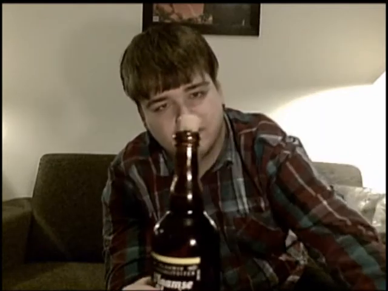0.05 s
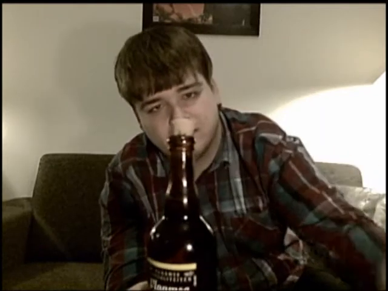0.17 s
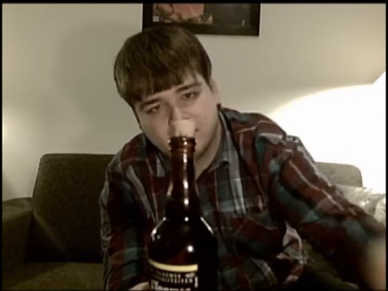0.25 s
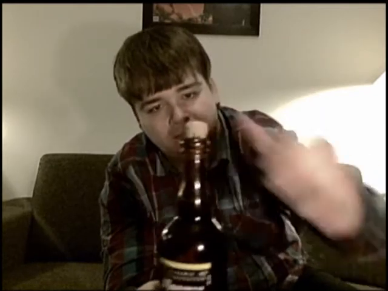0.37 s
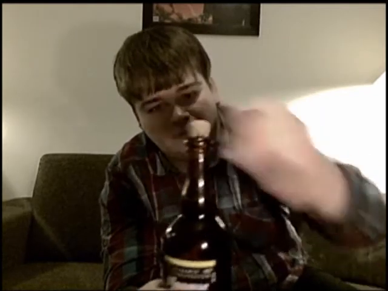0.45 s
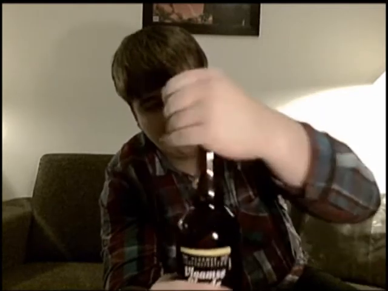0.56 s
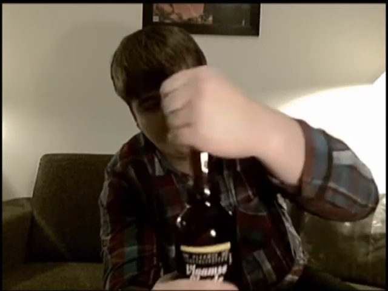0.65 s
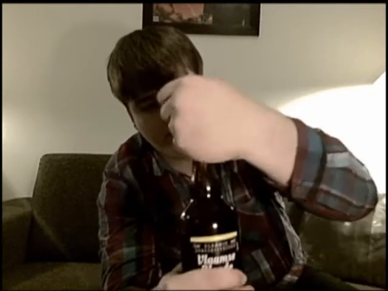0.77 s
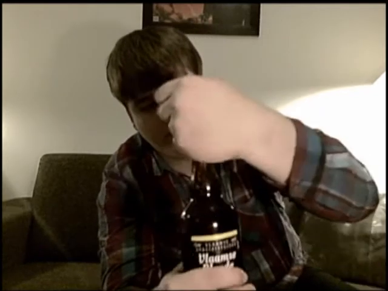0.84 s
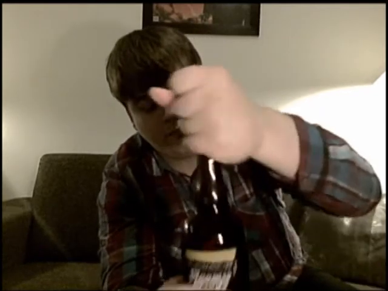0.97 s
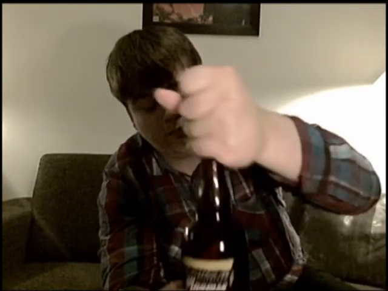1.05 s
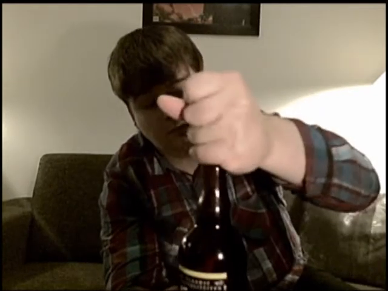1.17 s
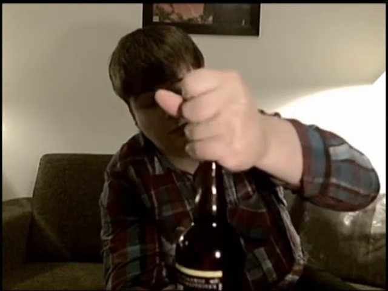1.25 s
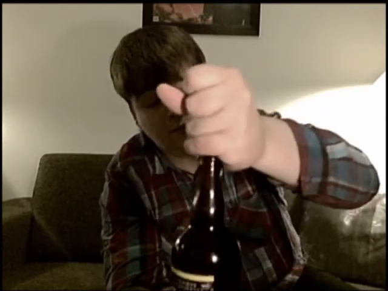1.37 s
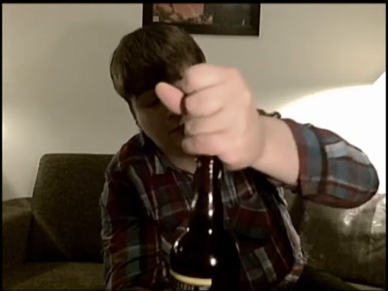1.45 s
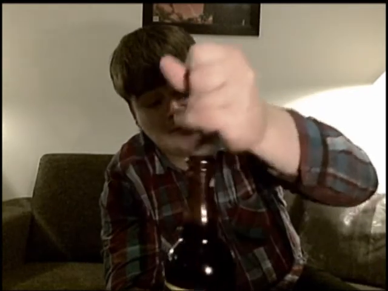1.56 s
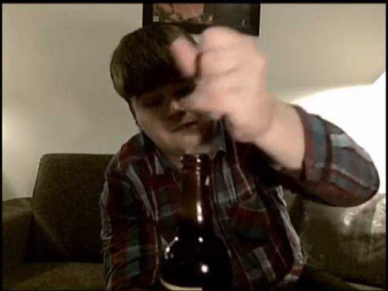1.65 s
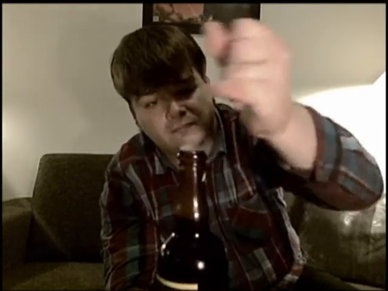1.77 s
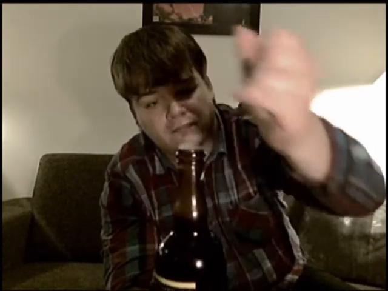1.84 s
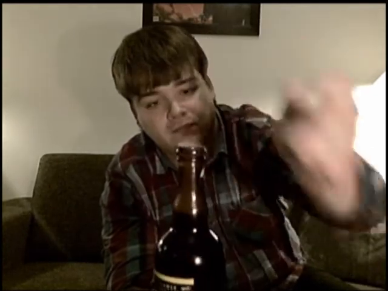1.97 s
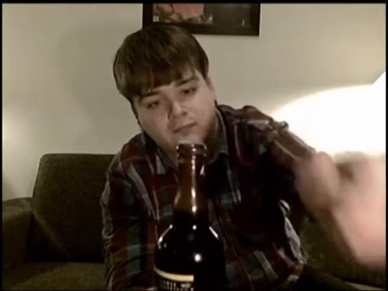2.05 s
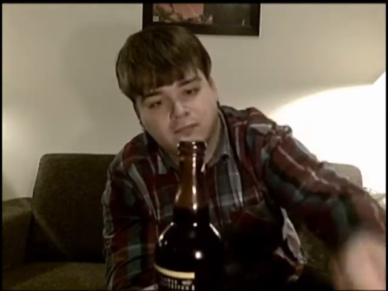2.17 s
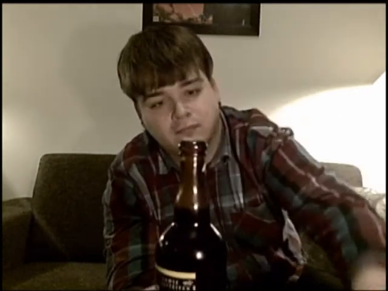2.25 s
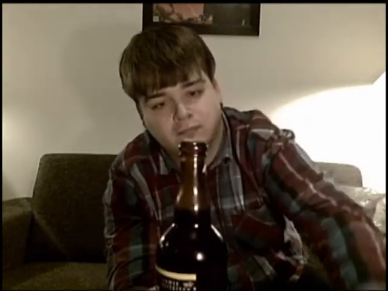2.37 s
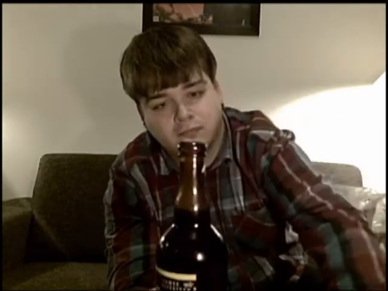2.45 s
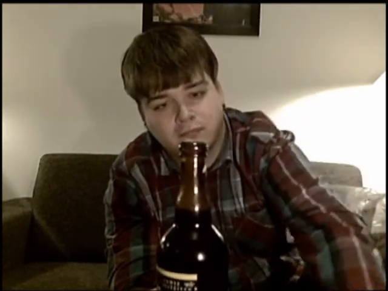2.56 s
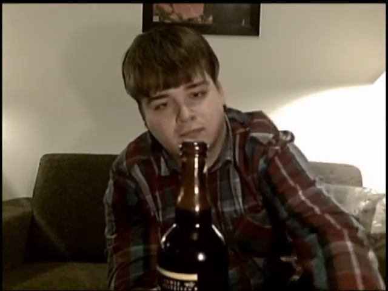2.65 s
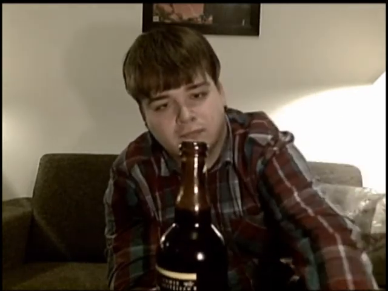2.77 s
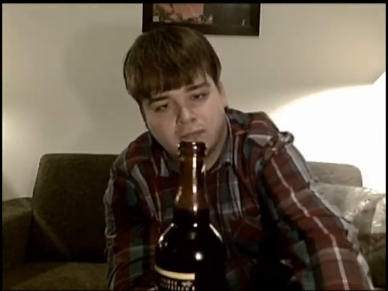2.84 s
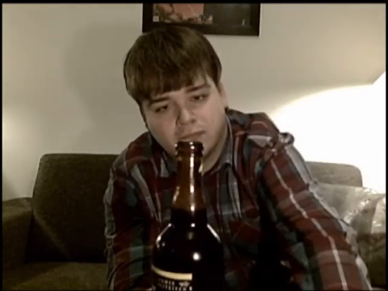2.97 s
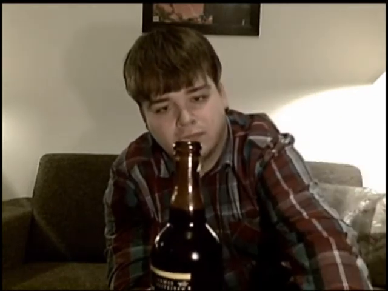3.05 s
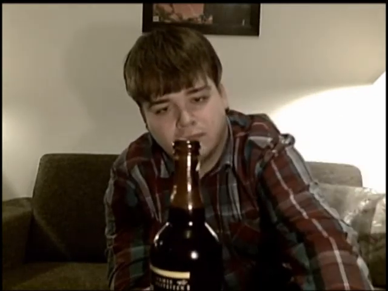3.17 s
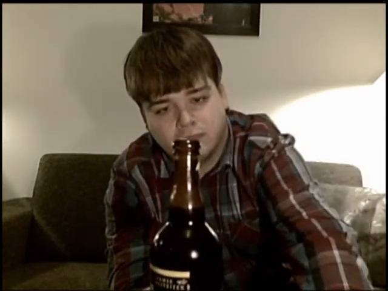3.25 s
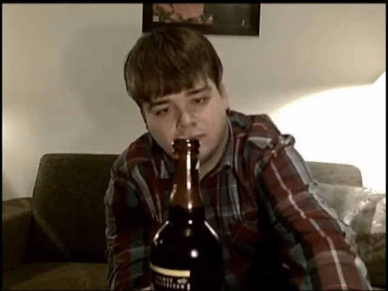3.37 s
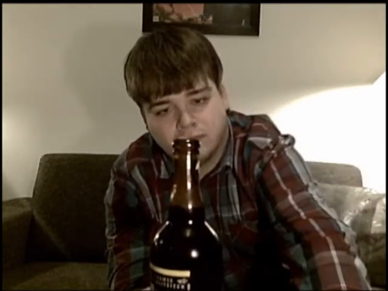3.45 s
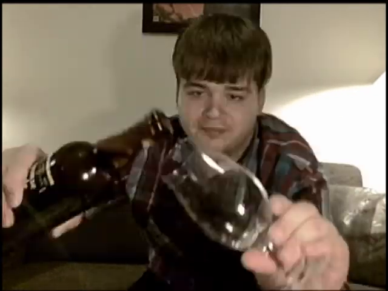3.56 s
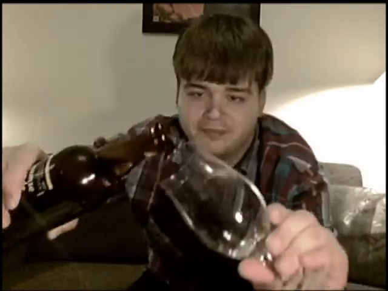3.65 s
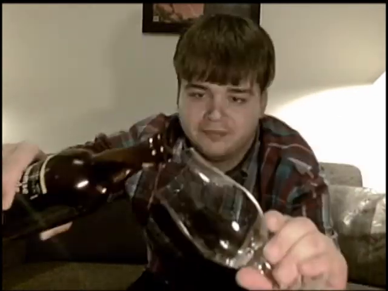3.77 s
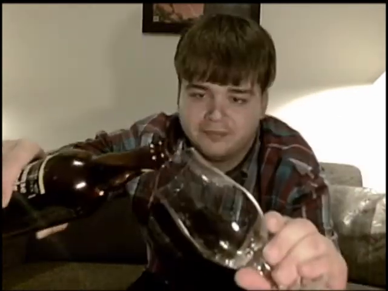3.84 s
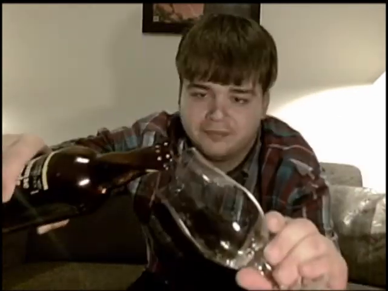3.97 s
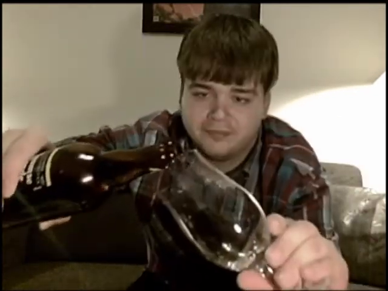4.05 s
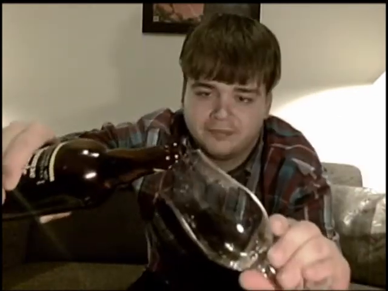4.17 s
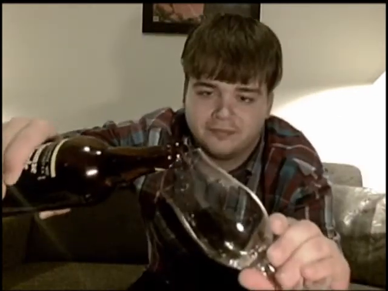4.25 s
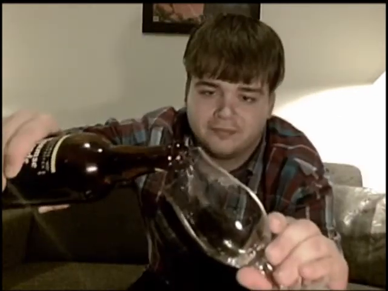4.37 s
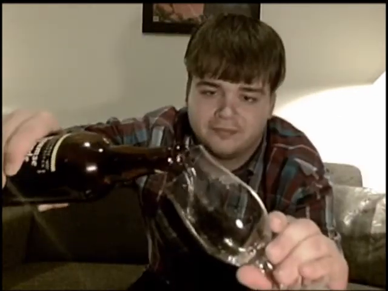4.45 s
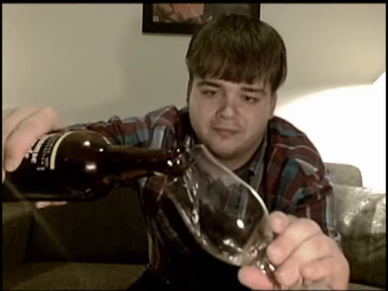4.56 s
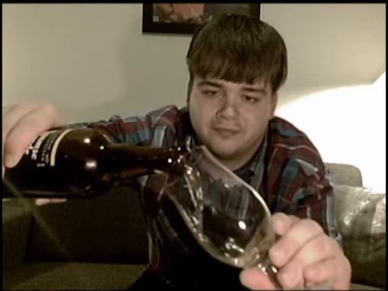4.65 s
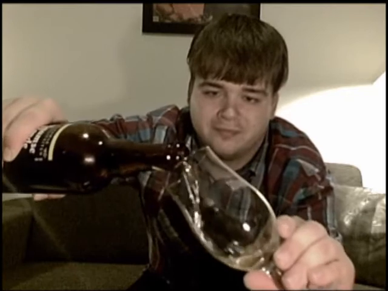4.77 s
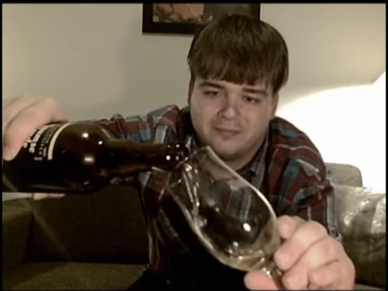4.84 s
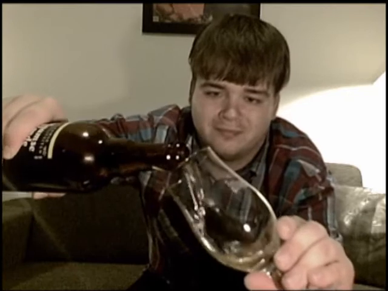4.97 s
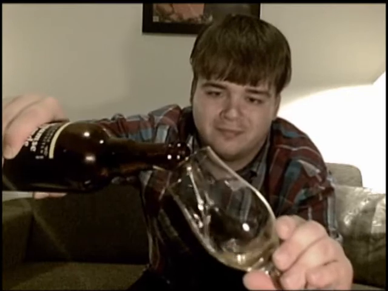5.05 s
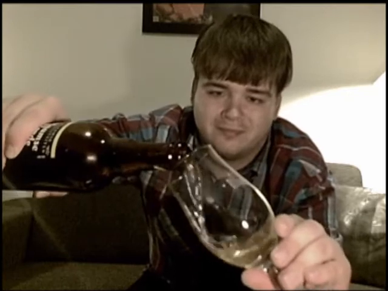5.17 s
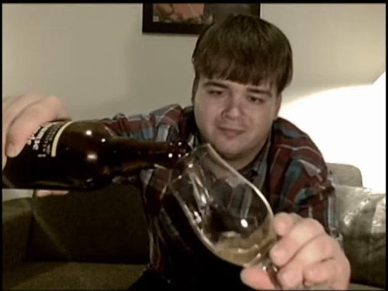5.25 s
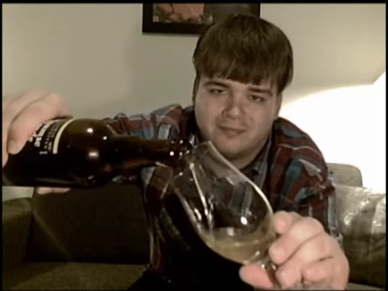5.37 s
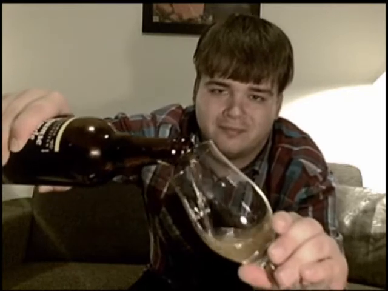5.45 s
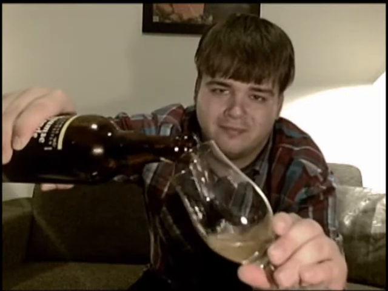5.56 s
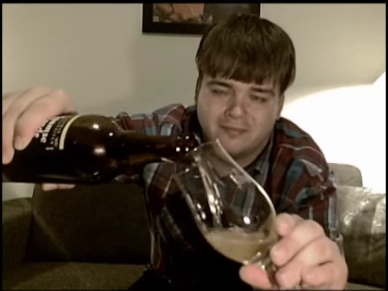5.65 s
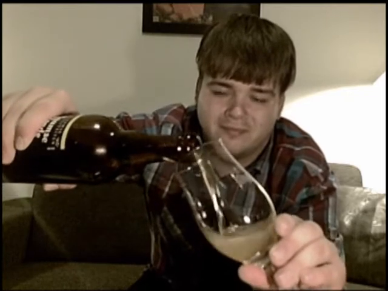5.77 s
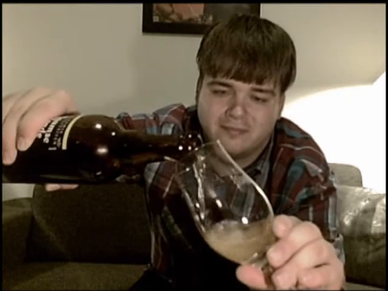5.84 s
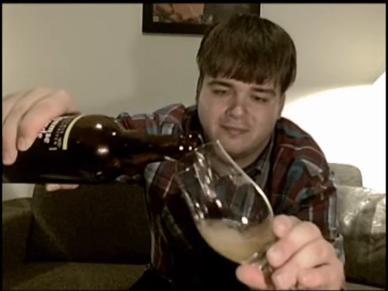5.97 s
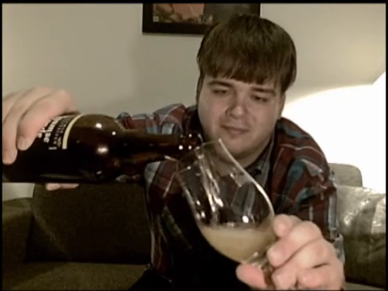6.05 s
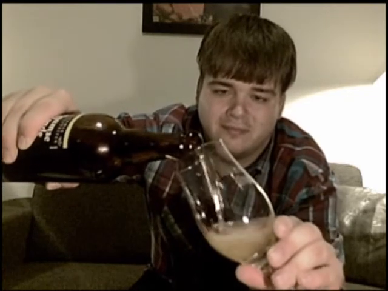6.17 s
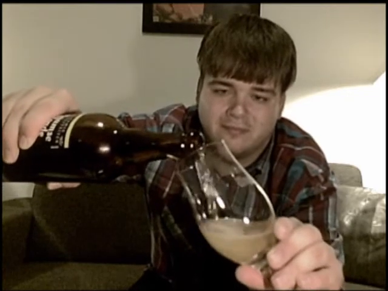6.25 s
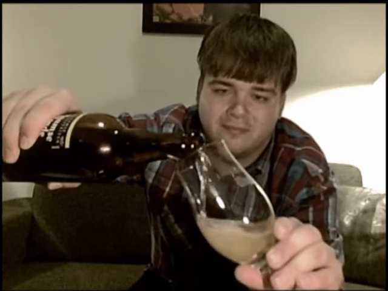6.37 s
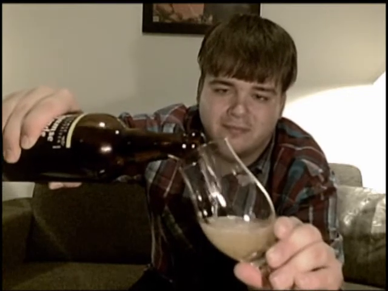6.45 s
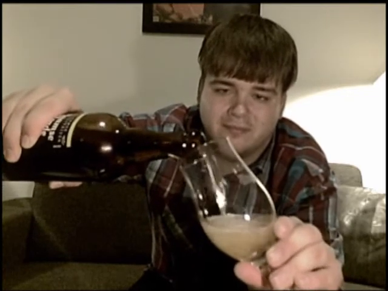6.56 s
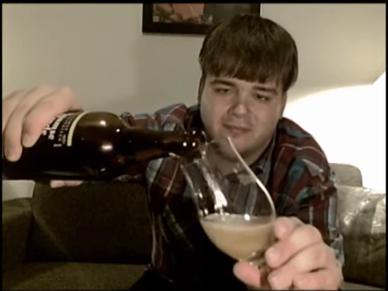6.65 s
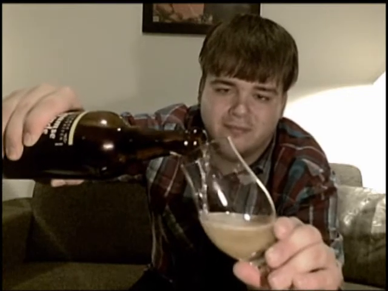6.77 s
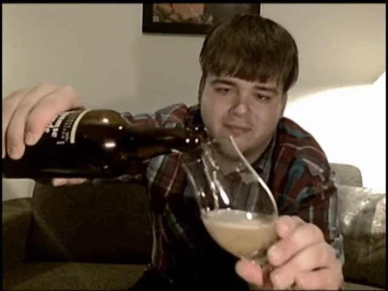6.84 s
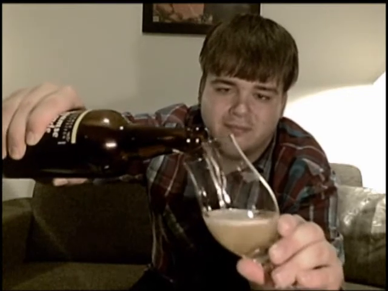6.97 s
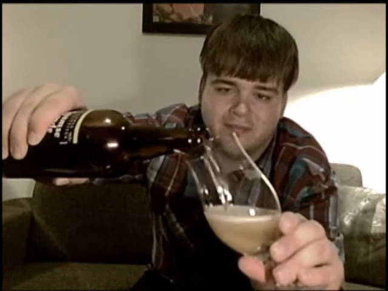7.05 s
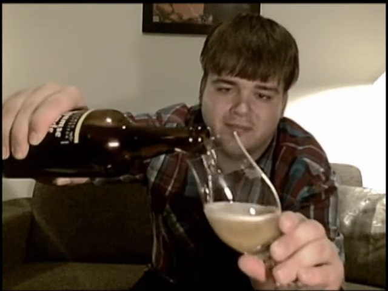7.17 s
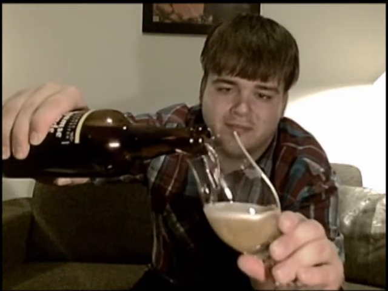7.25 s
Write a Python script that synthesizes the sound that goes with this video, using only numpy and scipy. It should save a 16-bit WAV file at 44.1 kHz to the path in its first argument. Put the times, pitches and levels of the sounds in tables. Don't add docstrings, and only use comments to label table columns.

```python
import sys
import numpy as np
from scipy import signal
from scipy.fft import rfft, irfft
from scipy.io import wavfile
from scipy.ndimage import uniform_filter1d

SR = 44100
rng = np.random.default_rng(int(sys.argv[2]) if len(sys.argv) > 2 else 0)


def gain_from_db(level_db):
    decades = np.asarray(level_db, float) / 20
    return 10 ** decades


def dump_mix(stems):
    frames = np.atleast_2d(stems).T
    limited = np.clip(frames, -1, 1)
    pcm = np.round(limited * 32767).astype(np.int16)
    wavfile.write(sys.argv[1], SR, pcm)


N = 322371

# freq_hz, density_db
FAN_SPECTRUM = [(15, -34.5), (25, -2.5), (500, -8.5), (1300, -12), (1700, -18.5), (6340, -24.5),
                (8500, -35.5), (18700, -135)]
# freq_hz, rms_db
MOTOR_LINES = [(247.6, -63.5), (742.9, -69.5), (1082, -79), (1114, -61.5), (1669, -66.5), (2229, -76.5)]
# start_s, knock_db, upper_mode_db, rattle_db
BOUNCES = [(0.228, -21, -56, -20), (0.24, -48, -50, -52), (0.251, -36, -62, -48), (0.286, -24.5, -35, -33),
           (0.31, -30.5, -42, -64), (0.335, -28.5, -43, -30.5), (0.35, -33.5, -41, -55),
           (0.401, -33, -43, -29.5), (0.502, -39.5, -54, -36), (0.525, -33.5, -62, -47),
           (0.545, -32.5, -56, -48), (0.564, -44, -62, -59), (0.799, -42, -64, -60), (0.827, -48, -64, -58)]
# freq_hz, level_db, t60_s
TABLE_LOW = [(837, 6.5, 0.025), (431, -1, 0.025), (334, -11, 0.066), (185, 2.5, 0.018), (102, -16.5, 0.047)]
# freq_hz, level_db, t60_s
TABLE_UPPER = [(1440, 8, 0.027), (1280, 6.5, 0.035)]
# freq_hz, level_db, t60_s
WIRE = [(5520, -1.5, 0.0095), (6420, -2.5, 0.008), (2730, -5, 0.0091)]
# centre_hz, t60_s, level_db
TAIL = [(91, .45, -12.5), (172, 0.36, -8.5), (360.2, 0.43, -8), (670, 0.24, -3.5), (1443, .28, -2.5),
        (2835, 0.37, -0.5), (5800, .27, -1.5), (8900, .25, -11)]
# freq_hz, level_db, t60_s
SLIP = [(1540, -17, 0.013), (2420, -7, 0.016), (4120, -4, 0.024), (5130, -7, 0.016)]
# centre_hz, level_db
BLAST = [(110, -12.5), (210, 6), (340, -1), (1700, -18.5), (3800, -23.5)]
# freq_hz, level_db, t60_s
NECK = [(604, 4, 0.18), (593, -7.5, 0.27), (612, -21, .45), (479, -20, .3), (538, -14, .27), (682, -11, .3),
        (719, -16, .25), (406, -17.5, 0.25), (330, -32, 0.29), (258, -25, 0.08), (183, -22.5, 0.44),
        (1160, -26.5, .15)]
# start_s, peak_db, pitch_share_of_bowl_note
BUBBLES = [(3.787, -41, 0.88), (4.143, -45.5, 0.88), (4.37, -44, 1.01), (4.491, -40, 0.97),
           (4.66, -32.5, .99), (4.995, -34.5, 0.91), (5.011, -33, 0.99), (5.336, -45.5, .99),
           (5.436, -46.5, .97), (5.74, -40.5, 0.9), (5.806, -44.5, 1.08), (5.962, -42.5, .98),
           (6.148, -43, 1.08), (6.164, -37.5, .94), (6.184, -46, 1.08), (6.238, -31, 1.025),
           (6.325, -41, 1.02), (6.365, -43, 1.04), (6.383, -37, 1), (6.409, -40, 1.01),
           (6.565, -30.5, 0.96), (6.589, -37.5, 0.97), (6.616, -29, 0.98), (6.639, -43, 1.06),
           (6.686, -42.5, 0.96), (6.957, -44, 0.78), (6.981, -39.5, 1), (7.04, -52, .97),
           (7.105, -45, 1.04)]
# start_s, plop_db, tick_hz, tick_db
DROPS = [(4.9949, -18.5, 2760, -46), (5.0214, -31, 2240, -32), (5.3414, -31, 2334, -33),
         (5.444, -39, 3240, -52), (5.7397, -41, 2480, -38), (5.806, -53, 3150, -53),
         (5.9008, -56, 3000, -51), (5.9665, -44, 3100, -46), (6.165, -22, 2450, -37),
         (6.577, -28, 2380, -30.5), (7.016, -42, 2570, -48), (7.0584, -41, 2240, -57)]
# start_s, peak_db, pitch_hz
GULPS = [(3.797, -48, 233), (3.899, -38, 258), (4.148, -38, 236), (4.489, -43, 163), (4.987, -34, 178),
         (5.186, -31.5, 217), (5.206, -30.5, 246), (6.026, -30.5, 221), (6.06, -32.5, 177), (6.1, -38, 168),
         (7.05, -31, 249), (7.093, -33, 245), (7.246, -41, 246)]

FAN_RMS_DB = -50
CASE_HZ, CASE_WIDTH_SHARE, CASE_DB = 242, 0.027, 5.5
TICK_S, TICK_DB = 1.148, -9
POP_S, POP_DB = 1.6732, 19
PUFF_HZ, PUFF_DB, PUFF_LAG_S = 260, -2.5, 0.00034
HISS_HZ, HISS_DB = 6900, 1.5
POUR_S = 4.0
BOWL_HZ, BOWL_RISE_HZ_PER_S = 583.6, 53.3
BUBBLE_T60_S, BOWL_RING_DB, BOWL_T60_S = 0.047, -6.5, 0.2
PLOP_HZ, PLOP_RISE_HZ_PER_S, SPLASH_DB = 1065, 188, -2
GULP_T60_S = 0.059
CAGE_WET_DB = 2
NECK_WET_DB = -19
BOWL_WET_DB = -7
POUR_WET_DB = -3
INPUT_HZ, SELF_NOISE_DB = 7900, -94.5
CEILING, TOP_HZ = 0.97, 15800


def ring(hz, t60_s, rise_s=0.0003, glide=0.0):
    t = np.arange(int(SR * 0.5)) / SR
    fade = np.exp(-np.log(1000) * t / max(t60_s, 0.001))
    rise = 1 - np.exp(-t / rise_s)
    return np.sin(2 * np.pi * hz * t * (1 + glide * t / (t + t60_s))) * fade * rise


def body(modes, rise_s=0.00027, detune=0.0):
    shift = 1 + detune * rng.standard_normal(len(modes))
    return sum(gain_from_db(db) * ring(hz * k, t60_s, rise_s) for (hz, db, t60_s), k in zip(modes, shift))


def two_octaves(order, hz):
    return signal.butter(order, [hz / 2, min(hz * 2, 0.4 * SR)], "bandpass", fs=SR, output="sos")


def burst(hz, t60_s):
    t = np.arange(int(SR * 0.5)) / SR
    noise = signal.sosfilt(two_octaves(1, hz), rng.standard_normal(len(t)))
    return noise * np.exp(-np.log(1000) * t / t60_s) * (1 - np.exp(-t / 0.00058))


def crack(hz):
    step = np.zeros(int(SR * 0.5))
    step[0] = 1
    pulse = signal.sosfilt(two_octaves(2, hz), step)
    return pulse / np.abs(pulse).max()


def add(track, start_s, sound):
    i = int(start_s * SR)
    track[i:i + len(sound)] += sound[:N - i]


def fan():
    hz = np.fft.rfftfreq(N, 1 / SR)
    point_hz, point_db = np.transpose(FAN_SPECTRUM)
    colour = gain_from_db(np.interp(np.log(hz + 1), np.log(point_hz), point_db))
    colour = colour * gain_from_db(CASE_DB * np.exp(-((hz / CASE_HZ - 1) / CASE_WIDTH_SHARE) ** 2))
    hiss = irfft(rfft(rng.standard_normal(N)) * colour, N)
    out = hiss * gain_from_db(FAN_RMS_DB) / hiss.std()
    for line_hz, db in MOTOR_LINES:
        waver = uniform_filter1d(rng.standard_normal((2, N)), SR // 5, axis=1) * np.sqrt(SR // 5)
        phase = 2 * np.pi * line_hz * np.arange(N) / SR + 0.61 * waver[0]
        out += gain_from_db(db + 2.5 + 0.74 * waver[1]) * np.sin(phase)
    return out


def cage():
    out = np.zeros(N)
    for start_s, knock_db, upper_db, rattle_db in BOUNCES:
        rattle = body(WIRE, detune=0.032) + gain_from_db(-12) * crack(5500) + burst(3800, 0.022)
        knock = gain_from_db(knock_db + 4.5) * body(TABLE_LOW, 0.0037, 0.022)
        knock += gain_from_db(upper_db + 3) * body(TABLE_UPPER, 0.001, 0.045)
        add(out, start_s - 0.001, knock + gain_from_db(rattle_db - 4.5) * rattle)
    return out


def room():
    t = np.arange(int(SR * 0.7)) / SR
    response = np.zeros(len(t))
    for hz, t60_s, db in TAIL:
        sos = signal.butter(2, [hz / np.sqrt(2), hz * np.sqrt(2)], "bandpass", fs=SR, output="sos")
        band = signal.sosfilt(sos, rng.standard_normal(len(t))) * np.exp(-np.log(1000) * t / t60_s)
        response += gain_from_db(db) * band * np.sqrt(2 * np.log(1000) / (t60_s * SR))
    return response * (1 - np.exp(-t / 0.0023))


def cork():
    out, neck = np.zeros((2, N))
    snap = gain_from_db(2.5) * crack(2170) + gain_from_db(6) * crack(1170)
    snap += gain_from_db(-1) * burst(1200, 0.022) + gain_from_db(-17) * crack(640)
    add(out, TICK_S, -gain_from_db(TICK_DB - 13.5) * snap)
    add(neck, TICK_S, -gain_from_db(TICK_DB - 11.5) * body(SLIP))

    blast = sum(gain_from_db(db - 6) * crack(hz) for hz, db in BLAST)
    add(out, POP_S, -gain_from_db(POP_DB) * blast)
    add(out, POP_S, gain_from_db(POP_DB + HISS_DB) * ring(HISS_HZ, 0.0007, rise_s=0.0001))
    add(neck, POP_S, -gain_from_db(POP_DB - 7) * body(NECK))
    add(neck, POP_S + PUFF_LAG_S, gain_from_db(POP_DB + PUFF_DB) * ring(PUFF_HZ, 0.01518))
    return out, neck


def bubbles():
    out = np.zeros(N)
    for start_s, db, share in BUBBLES:
        hz = share * (BOWL_HZ + BOWL_RISE_HZ_PER_S * (start_s - POUR_S))
        bubble = ring(hz, BUBBLE_T60_S, rise_s=0.0028, glide=0.13)
        bowl_air = ring(hz, BOWL_T60_S, rise_s=0.011)
        beer_slug = ring(0.802 * hz, 1.1 * BUBBLE_T60_S, rise_s=0.0034)
        add(out, start_s - 0.0025, gain_from_db(db + 9) * bubble)
        add(out, start_s, gain_from_db(db + BOWL_RING_DB) * bowl_air)
        add(out, start_s - 0.002, gain_from_db(db - 1) * beer_slug)
    return out


def pour():
    out = np.zeros(N)
    for start_s, db, hz in GULPS:
        add(out, start_s, gain_from_db(db + 0.5) * ring(hz, GULP_T60_S, rise_s=0.0036, glide=-0.2))
    for start_s, plop_db, tick_hz, tick_db in DROPS:
        plop_hz = PLOP_HZ + PLOP_RISE_HZ_PER_S * (start_s - POUR_S)
        plop = ring(plop_hz, 0.017, rise_s=0.00081, glide=0.027) + gain_from_db(-26) * crack(1500)
        tick = ring(tick_hz, 0.015, rise_s=0.0009, glide=-0.041)
        tick += gain_from_db(-0.5) * ring(0.917 * tick_hz, 0.0065, rise_s=0.0009)
        tick += gain_from_db(-3) * ring(1.11 * tick_hz, 0.0048, rise_s=0.00092)
        splash = gain_from_db(tick_db + SPLASH_DB) * burst(4000, 0.015)
        add(out, start_s - 0.001, gain_from_db(plop_db) * plop + gain_from_db(tick_db + 7.5) * tick + splash)
    return out


def scene():
    hiss, table, response = fan(), cage(), room()
    stopper, neck = cork()
    bowl, stream = bubbles(), pour()
    sent = stopper + gain_from_db(CAGE_WET_DB) * table + gain_from_db(NECK_WET_DB) * neck
    sent += gain_from_db(BOWL_WET_DB) * bowl + gain_from_db(POUR_WET_DB) * stream
    reflected = signal.fftconvolve(sent, response)[:N]
    return (table + stopper + neck + bowl + stream + reflected + hiss)[None]


def roll_off(x):
    return signal.sosfilt(signal.butter(12, 16890, fs=SR, output="sos"), x)


def record(dry):
    narrow = signal.sosfilt(signal.butter(8, INPUT_HZ, fs=SR, output="sos"), dry)
    held = np.clip(narrow, -CEILING, CEILING)
    held = held + gain_from_db(SELF_NOISE_DB) * rng.standard_normal(dry.shape)
    held = signal.sosfiltfilt(signal.ellip(6, 0.1, 25, TOP_HZ, fs=SR, output="sos"), held)
    return roll_off(np.clip(held, -1, 1))


dry = scene()
out = record(dry)
dump_mix(out)
```